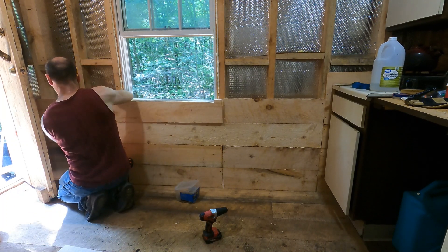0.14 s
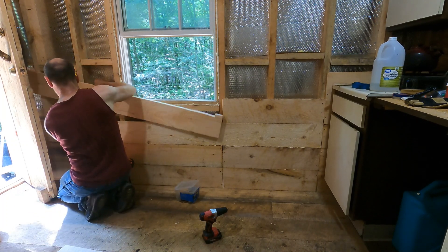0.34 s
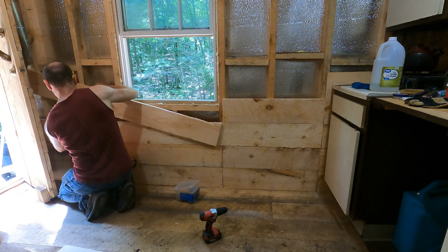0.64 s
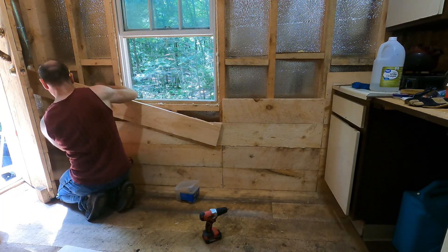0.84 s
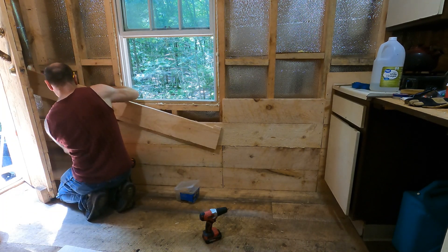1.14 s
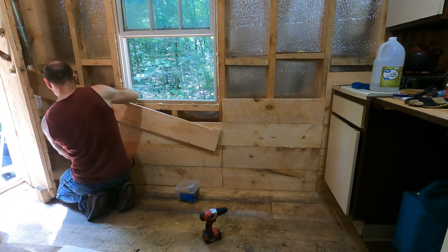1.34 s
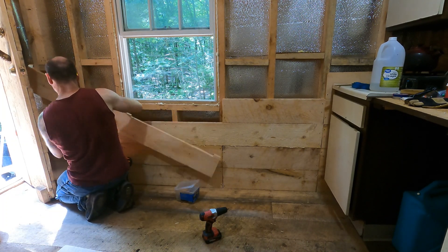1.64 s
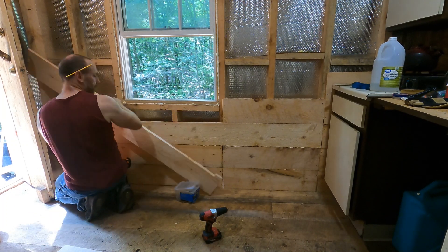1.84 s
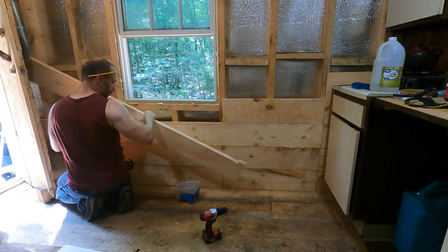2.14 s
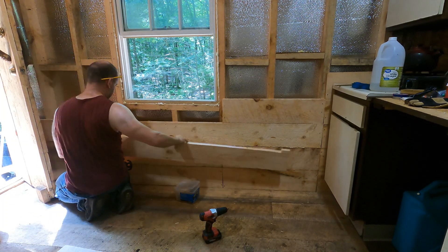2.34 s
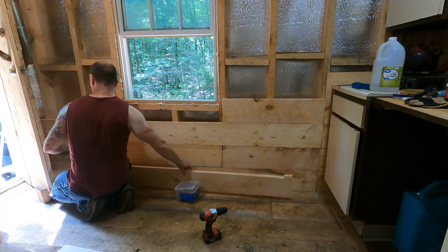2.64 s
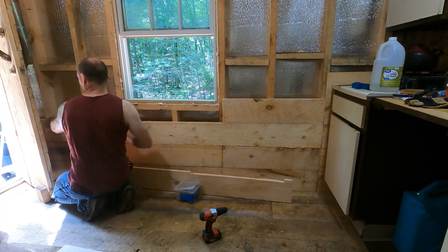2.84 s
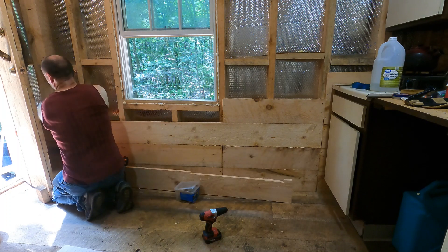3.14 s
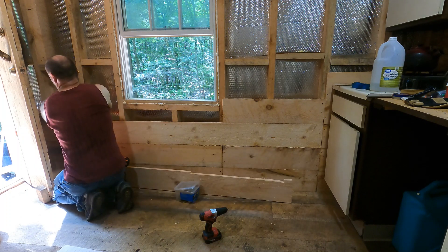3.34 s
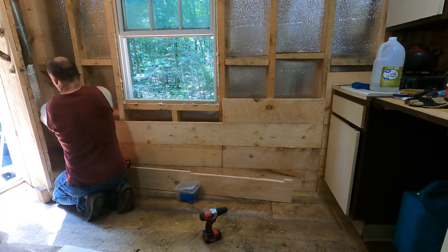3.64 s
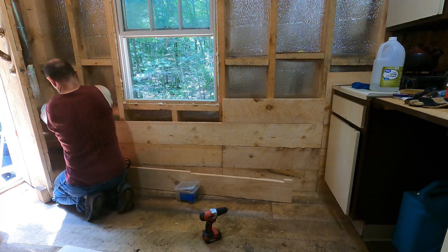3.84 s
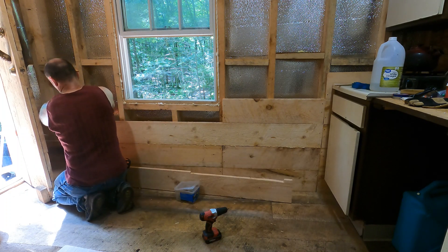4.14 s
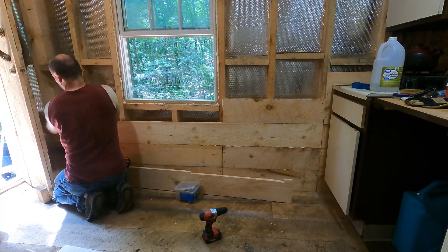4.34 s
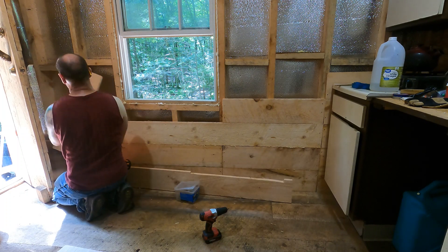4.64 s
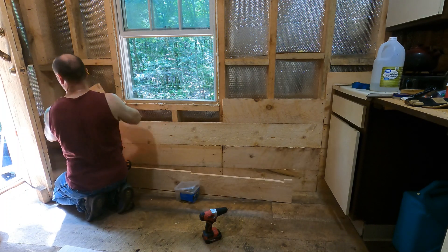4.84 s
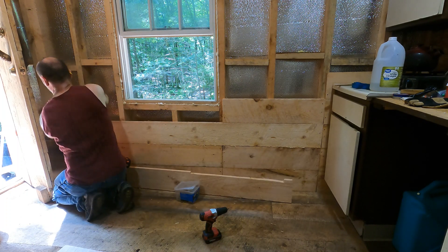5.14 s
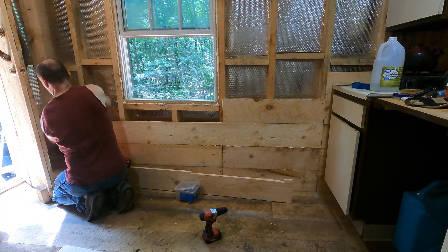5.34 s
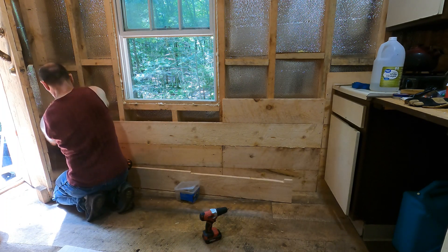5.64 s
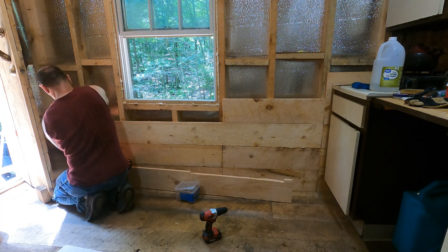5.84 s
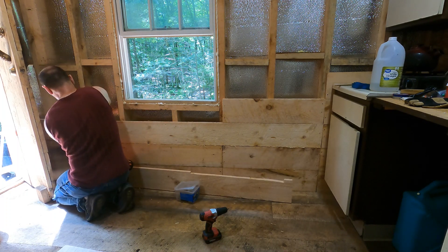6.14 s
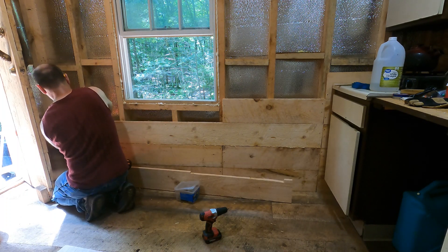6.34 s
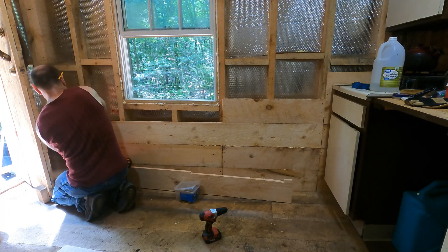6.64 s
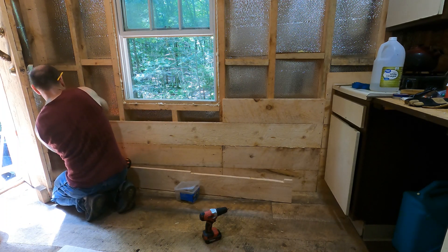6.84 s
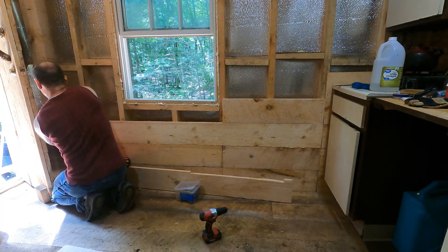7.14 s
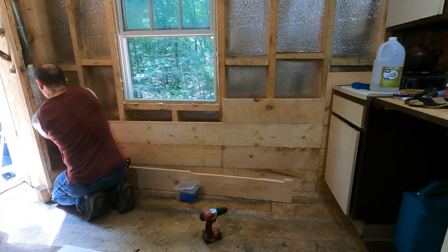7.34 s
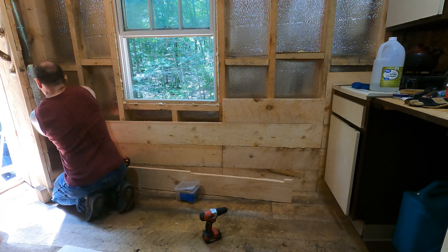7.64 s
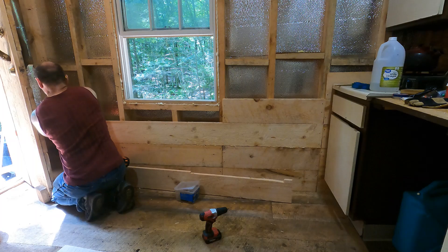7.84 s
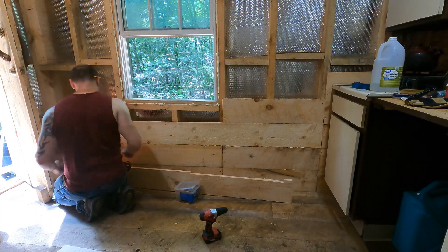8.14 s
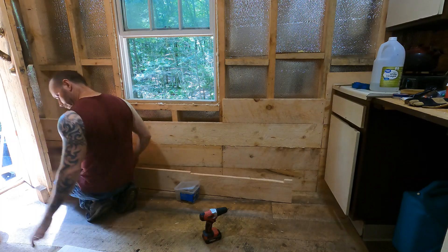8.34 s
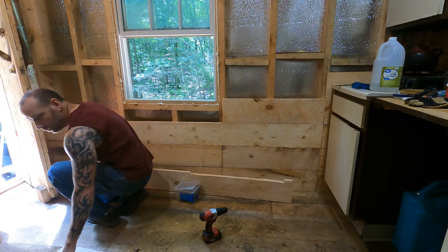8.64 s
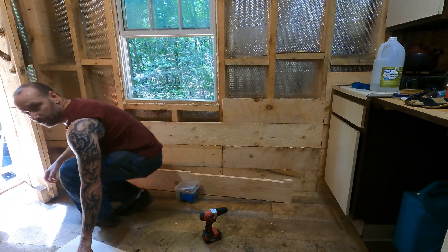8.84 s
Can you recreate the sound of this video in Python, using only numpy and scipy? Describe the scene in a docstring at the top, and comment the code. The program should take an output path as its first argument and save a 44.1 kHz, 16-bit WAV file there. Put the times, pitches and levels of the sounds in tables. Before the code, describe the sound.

Inside a small wooden building, planks are pulled loose and knocked against wall studs. Muffled bumps come first, then spaced harder knocks, a quick scrape and clatter as a board is set down, more fumbling thuds, two groups of firm knocks, and finally heavy soft floor thuds with brushing rubs. Faint dull taps recur further off. The stereo microphone sits a few metres away, with short, boxy room sound.

```python
"""Boards knocked about in a small wooden shed

Boards are pulled off, set down and thumped against the studs: each knock rings wall modes and a dense rattle.
Wood and cloth rub as patchy noise strokes; an edge skates, driving broad board resonances.
Soft thuds swing one low mode each; the floor rumbles under a kneeling weight and after knocks.
Further off a soft, dull two-tone tap comes and goes, often about a quarter second apart; air rustles faintly."""
import sys
import numpy as np
from scipy import signal
from scipy.fft import rfft, irfft, next_fast_len
from scipy.io import wavfile
from scipy.ndimage import uniform_filter1d, map_coordinates

SR = 44100
rng = np.random.default_rng(int(sys.argv[2]) if len(sys.argv) > 2 else 0)


def transcribe(signal):
    """Save signal, clipped to [-1, 1], as a 16-bit WAV file at the path in sys.argv[1]."""
    frames = np.atleast_2d(signal).T
    limited = np.clip(frames, -1, 1)
    pcm = np.round(limited * 32767).astype(np.int16)
    wavfile.write(sys.argv[1], SR, pcm)


N = 396900


def amp(db):
    """Gain of a level in dB."""
    return 10 ** (np.asarray(db) / 20)


def unit(x):
    """x at rms 1."""
    return x / np.sqrt(np.mean(x ** 2) + 1e-20)


def curves(rows, outside_db=-120):
    """One value per sample for each column after the time."""
    s, *cols = np.transpose(rows)
    t = np.arange(N) / SR
    return [np.interp(t, s, col, outside_db, outside_db) for col in cols]


def wobble(knots_per_s):
    """A smooth random curve through normally distributed knots."""
    knots = rng.standard_normal(int(N * knots_per_s / SR) + 4)
    return map_coordinates(knots, [np.arange(N) * knots_per_s / SR])


# Stereo image. Each row: frequency in Hz, left-right correlation 0-1, left over right in dB.
STEREO_IMAGE = [(220, .999, .2), (550, .97, .2), (1400, .85, 1.4), (4500, .72, .9), (11000, .87, .7)]


def noise(spectrum, size=N, ripple_db=0):
    """Stereo noise of rms 1 with a colour, alike in the bass, wider higher up; ripple adds random resonances."""
    m = next_fast_len(size)
    log_hz = np.log(np.fft.rfftfreq(m, 1 / SR) + 1)
    hz, db = np.transpose(spectrum)
    pair_hz, alike, lead_db = np.transpose(STEREO_IMAGE)
    turn = np.arccos(np.interp(log_hz, np.log(pair_hz), alike)) / 2
    lead = amp(np.interp(log_hz, np.log(pair_hz), lead_db) / 2)
    ripple = unit(uniform_filter1d(rng.standard_normal(len(log_hz)), size=30))
    gain = amp(np.interp(log_hz, np.log(hz + 1), db) + ripple_db * ripple)
    middle, side = rfft(rng.standard_normal((2, m))) * gain * [np.cos(turn), np.sin(turn)]
    return unit(irfft([(middle + side) * lead, (middle - side) / lead], m)[:, :size])


def patchy(x, patchy_db):
    """x under random patches of gain in time and frequency, at rms 1."""
    z = signal.stft(x, nperseg=512)[2]
    field = uniform_filter1d(rng.standard_normal(z.shape[1:]), size=3, axis=0)
    field = uniform_filter1d(field, size=5, axis=1)
    return unit(signal.istft(z * amp(patchy_db * unit(field)), nperseg=512)[1][:, :N])


def add(track, sound, s):
    """Mixes a sound into a track at a time in seconds."""
    part = track[:, round(s * SR):][:, :sound.shape[-1]]
    part += sound[..., :part.shape[1]]


# Rustle colour. Each row: frequency in Hz, relative density in dB per Hz.
AIR_COLOUR = [(500, -28), (900, -1), (3100, -1), (4500, -19.5), (16000, -22)]


def air():
    """A faint rustle that grows by half the dB of the shifting weight."""
    level_db = -50 + 0.5 * curves(FLOOR_WEIGHT)[0] + 5 * wobble(3.4)
    return amp(level_db) * patchy(noise(AIR_COLOUR), patchy_db=2)


# Far taps. Each row: time in seconds, level in dB.
FAR_TAPS = [(0.122, -33), (0.596, -36), (0.824, -38), (1.055, -36), (1.761, -43), (2.217, -39),
            (2.448, -35), (3.15, -39.5), (3.244, -41), (3.361, -36.5), (4.1, -34), (4.581, -38),
            (4.81, -33), (5.053, -34), (5.774, -38.5), (6.018, -32), (6.255, -31), (7.214, -41),
            (7.455, -40), (8.42, -44)]
# Tap tones. Each row: mean frequency in Hz, mean level in dB.
TAP_TONES = [(252, -2), (430, 0)]


def far_taps():
    """Short dull taps: two low tones and a puff of noise that swell, hold and stop."""
    out, t = np.zeros((2, N)), np.arange(SR // 10) / SR
    shape = (1 - np.exp(-t / 0.0044)) * np.exp(-(t / 0.035) ** 3)
    for s, db in FAR_TAPS:
        draws = rng.standard_normal((len(TAP_TONES), 3))
        tones = 0
        for (hz, tone_db), (level, pitch, phase) in zip(TAP_TONES, draws):
            tone = np.sin(2 * np.pi * hz * (1 + pitch / 100) * t + np.pi * phase)
            tones = tones + amp(tone_db + 2 * level) * tone
        puff = amp(-5) * noise(CREAK_COLOUR, size=len(t))
        add(out, amp(db) * shape * (tones + puff), s - .005)  # the swell starts early
    return out


# Weight shifting on the floor. Each row: time in seconds, level in dB.
FLOOR_WEIGHT = [(0, -39), (.3, -37), (1.8, -41.5), (1.95, -35), (2.15, -35.5), (2.35, -47.5), (3.0, -53.5),
                (3.3, -38.5), (4.98, -55.5), (5.1, -33.5), (5.85, -44.5), (6.15, -38), (6.45, -49),
                (8.6, -45), (8.68, -25.5), (9, -27.5)]
# Joist rumble colour. Each row: frequency in Hz, relative density in dB per Hz.
RUMBLE_COLOUR = [(28, -8.5), (59, 7), (97, 0), (190, -56.5)]
# Plank murmur colour, also the tap puff. Each row: frequency in Hz, relative density in dB per Hz.
CREAK_COLOUR = [(80, -39.5), (140, -0.5), (324, -13), (420, -6), (600, -34.5), (1300, -110)]
JOIST_RE_BOARD_DB, JOIST_T60_S = -12, 0.79


def floor():
    """Shifting weight and the knocks make the joists rumble in lumps and the planks murmur."""
    s, board_db = np.transpose(KNOCKS)[:2]
    kick_power = np.bincount((s * SR).astype(int), amp(2 * (board_db + JOIST_RE_BOARD_DB)), N)
    after_power = signal.lfilter([1], [1, -amp(-120 / (JOIST_T60_S * SR))], kick_power)
    level = np.sqrt(amp(2 * curves(FLOOR_WEIGHT)[0]) + after_power)
    lump = wobble(7.6)
    rumble = unit(amp(2.5 * lump) * noise(RUMBLE_COLOUR))
    creak_gain = amp(5 * lump + 1.3 * wobble(15))
    creak = unit(creak_gain * patchy(noise(CREAK_COLOUR), patchy_db=3.5))
    return level * (rumble + amp(-9.5) * creak)


# Thuds of a knee, a foot or the flat of a board. Each row: start in seconds, level in dB, mode in Hz.
SOFT_THUDS = [(0.222, -14, 69), (0.352, -8, 66.3), (.41, -12, 64), (0.847, -9, 82.9), (1.966, -8.5, 67),
              (2.028, -7.5, 58), (3.004, -12.5, 68.5), (3.475, -4, 147), (3.505, -7.5, 151.3),
              (4.811, -21.5, 69.6), (5.391, -15.5, 79), (5.495, -13.5, 139.4), (5.788, -25.5, 80),
              (6.213, -16, 60.2), (6.495, -4.5, 55.3), (6.638, -8, 56), (8.643, -6.5, 73), (8.813, -5, 85),
              (8.837, -13.5, 81)]
THUD_T60_S = 0.13


def thuds():
    """A soft weight sets one low mode swinging, with a weak overtone."""
    out, t = np.zeros((2, N)), np.arange(SR * 2 // 5) / SR
    for s, db, hz in SOFT_THUDS:
        overtone = np.sin(2 * np.pi * 1.7 * hz * t + rng.uniform(0, 2 * np.pi))
        swing = np.sin(2 * np.pi * hz * t) + amp(-11.0) * overtone
        add(out, amp(db - 60 * t / THUD_T60_S) * (1 - np.exp(-t / 0.0061)) * swing, s)
    return out


# Board resonances. Each row: centre in Hz, width before sharpening in Hz, relative level in dB.
BOARD_RESONANCES = [(1750, 250, 2), (2240, 280, -2.5), (3080, 140, 3.5), (4487, 420, -4), (6200, 600, -14),
                    (7000, 350, -15), (8950, 950, -18.5), (10400, 1100, -19)]
# Skating level. Each row: time in seconds, level in dB.
SKATE_LEVEL = [(2.56, -65.5), (2.6, -37), (2.72, -46.5), (2.77, -53.5)]


def skating():
    """A board edge sliding down the wall drives a few broad resonances of the board."""
    m = next_fast_len(N)
    f = np.fft.rfftfreq(m, 1 / SR)
    power = 0
    for centre, width, db in BOARD_RESONANCES:
        response = np.abs(f * width / (centre * centre - f * f + 1j * f * width))
        power = power + amp(2 * db) * response ** 3  # sharpened
    scrape = amp(2.5 * wobble(250)) * noise([(20, 0), (20000, 0)])
    ringing = irfft(rfft(scrape, m) * np.sqrt(power), m)[:, :N]
    return amp(curves(SKATE_LEVEL)[0]) * patchy(ringing, patchy_db=4.5)


# Rubbing strokes. Each row: middle in seconds, half length in seconds, hiss level in dB.
RUB_STROKES = [(0.052, 0.083, -65.5), (0.21, 0.027, -50), (0.262, 0.014, -50.5), (0.394, 0.071, -46),
               (0.462, 0.013, -58), (0.538, 0.037, -57.5), (0.858, 0.013, -59), (0.939, 0.026, -60.5),
               (1.972, 0.032, -46), (2.068, 0.012, -57), (2.302, 0.032, -54), (2.458, 0.021, -56),
               (2.488, 0.015, -42.5), (2.563, 0.029, -33), (2.831, 0.027, -56.5), (3.336, 0.17, -73.5),
               (3.536, 0.041, -51), (4.088, 0.026, -51.5), (4.303, 0.034, -58.5), (4.587, 0.012, -62.5),
               (4.692, 0.017, -64.5), (4.806, 0.037, -58.5), (5.177, 0.01, -49.5), (5.404, 0.027, -62),
               (5.519, 0.028, -52), (5.701, 0.033, -52.5), (5.953, 0.014, -59), (6.051, 0.015, -58),
               (6.318, 0.024, -57), (7.174, 0.0051, -66.5), (8.173, 0.037, -66.5), (8.579, 0.034, -55.5),
               (8.648, 0.028, -45.5), (8.732, 0.018, -52.5), (8.799, 0.027, -33), (8.881, 0.025, -57),
               (8.941, 0.018, -45.5), (8.99, 0.024, -34)]
# Hiss colour. Each row: frequency in Hz, relative density in dB per Hz.
HISS_COLOUR = [(1500, -6.5), (2500, 1), (4300, -2.5), (14800, -15), (16400, -32)]
# Rasp colour. Each row: frequency in Hz, relative density in dB per Hz.
RASP_COLOUR = [(300, -15), (600, -7.5), (3000, -18), (4300, -37), (7000, -120)]
RASP_RE_HISS_DB, RASP_DB_PER_S, LONGEST_PRESS_S = -1.5, 85.5, .07  # a longer stroke presses harder
RUB_PATCH_DB = 1.6


def rubbing():
    """Strokes of wood and cloth swell and fade: a grainy hiss over a duller rasp."""
    t = np.arange(N) / SR
    middle, half, hiss_db = np.transpose(RUB_STROKES)[:, :, None]
    since = (t - middle) / half
    swell = np.exp(-since ** 2 * np.where(since > 0, .6, 1))  # trails off slower than it starts
    rasp_db = hiss_db + RASP_RE_HISS_DB + RASP_DB_PER_S * np.minimum(half, LONGEST_PRESS_S)
    hiss_level = np.sum(amp(hiss_db) * swell, 0)
    rasp_level = np.sum(amp(rasp_db) * swell, 0)
    catch = wobble(60)  # the surfaces catch and let go
    hiss_grit = amp(0.83 * catch + 2.4 * wobble(400))
    hiss = patchy(hiss_grit * noise(HISS_COLOUR), patchy_db=RUB_PATCH_DB)
    rasp_grit = amp(0.89 * catch + 0.87 * wobble(160))
    rasp = patchy(rasp_grit * noise(RASP_COLOUR), patchy_db=RUB_PATCH_DB)
    return hiss_level * hiss + rasp_level * rasp


# Wall modes. Each row: mean frequency in Hz, mean level in dB, t60 before hand damping in seconds.
WALL_MODES = [(54, -8, .3), (80, -1, .2), (140, -7, .18), (240, -4, .15), (345, 2, .14), (450, -6, .12),
              (607, -19, .08), (813, -11, .08), (945, -16, .07), (1160, -18, .06), (1570, -22, .06),
              (1985, -22, .06)]


def wall_ring(t):
    """Wall modes struck at a random spot, which shifts their pitch and strength, then chattering."""
    hz, mode_db, t60_s = np.transpose(WALL_MODES)[:, :, None]
    level_draw, pitch_draw = rng.standard_normal((2, len(WALL_MODES), 1))
    strength = amp(mode_db + 3 * level_draw) * amp(-60 * t / t60_s)
    modes = np.sum(strength * np.sin(2 * np.pi * hz * (1 + 0.017 * pitch_draw) * t), 0)
    modes = modes * (0.51 + amp(-60 * t / 0.53))  # the pressing hand takes the swing down
    bounces = (rng.uniform(0.00392, .022, 3) * SR).astype(int)  # the board chatters before it rests
    return modes + sum(amp(-8.5) * np.pad(modes, (k, 0))[:len(t)] for k in bounces)


# Knocks. Each row: start in seconds, board level in dB, rap re board in dB, crack re board in dB.
KNOCKS = [(0.315, -18.5, -26, -36), (0.344, -16.5, -20.5, -27), (0.394, -17.5, -24, -38.5),
          (0.425, -14, -16, -35), (0.502, -14, -24.5, -53), (0.555, -25.5, -32, -54),
          (0.607, -43, -8, -4.5), (0.682, -15.5, -5.5, -29), (1.082, -10.5, -6.5, -16.5),
          (1.262, -14, -9.5, -14.5), (1.498, -14, -8, -17),
          (1.585, -31, -9.5, -17.5),(1.847, -18.5, -18, -18.5), (1.964, -18, -15.5, -15),
          (2.154, -43.5, -8, -13.5), (2.568, -11, -7, -17.5), (2.693, -20.5, -21, -32),
          (2.763, -18, -17.5, -34), (2.777, -13, -2.5, -32), (2.82, -16.5, -16, -46.5),
          (3.436, -19.5, -4.5, -6.5), (3.463, -17.5, -2, -10.5), (3.501, -16, -9.5, -24.5),
          (3.547, -16, -21.5, -37.5), (3.603, -15.5, -21.5, -49.5), (3.685, -29.5, -12, -32.5),
          (3.752, -26.5, -25, -44), (3.826, -19.5, -19.5, -43), (4.094, -39, -7.5, -19),
          (4.313, -14.5, -23.5, -41.5), (4.352, -15, -17, -34), (5.08, -35.5, -9.5, -11),
          (5.184, -13, -13.5, -48.5), (5.239, -16, -32, -41.5), (5.261, -21.5, -21, -37),
          (5.46, -17.5, -34, -40), (5.485, -19.5, -24, -49), (5.771, -40, -13.5, -29.5),
          (6.071, -22.5, -36, -35.5), (6.214, -41.5, 2.5, -4.5), (6.493, -10, -7.5, -16),
          (6.637, -11, -7.5, -16), (6.793, -11, -8.5, -14), (7.325, -40.5, -7.5, -45),
          (7.512, -15, -15.5, -23.5), (7.671, -13.5, -10, -17.5), (7.847, -14.5, -9.5, -18.5),
          (8.031, -38, -14.5, -19), (8.963, -28.5, -4.5, -8.5)]
# Registers, low to high: thump, board, rap, snap, crack.
# Each row: low edge in Hz, high edge in Hz, main t60 in seconds, power share of dense rattle 0-1.
KNOCK_REGISTERS = [(47, 180, 0.34, 0.3), (135, 526, 0.21, 0.62), (625, 1260, 0.15, 0.84),
                   (1445, 3590, 0.17, 0.7), (2840, 23000, 0.12, 1)]
# Rattle colour. Each row: frequency in Hz, relative density in dB per Hz.
RATTLE_COLOUR = [(21, -30), (35, 4), (272, -4), (351, -7.5), (572, -19), (798, -13.5), (2010, -23),
                 (16000, -50.5)]
# Faint ring with each knock, louder on hard ones. Each row: frequency in Hz, relative density in dB per Hz.
SHIMMER_COLOUR = [(2900, -41), (3080, -2), (3240, -12.5), (3400, -2.5), (3600, -40.5), (7600, -44)]
THUMP_RE_BOARD_DB, THUMP_PER_CRACK = 3, 0.14  # harder blows pass more to the floor
SNAP_RE_RAP_DB, SNAP_SHARE = -3.5, 0.28  # share: how far the snap leans from rap to crack
# Span while the struck board is held clear of the studs. One row: start in seconds, end in seconds.
LOOSE_SPAN = (2.5, 4.5)
LOOSE_THUMP_DB, LOOSE_LOW_HZ = -2, 90  # a loose board thumps less and lacks deep bass


def knocks():
    """Each knock bounces a few times, rings the wall's modes and shakes loose a dense rattle."""
    out, t = np.zeros((2, N)), np.arange(SR // 3) / SR
    bands = [signal.butter(3, [low, min(high, TOP_HZ)], "bandpass", fs=SR, output="sos")
             for low, high, *_ in KNOCK_REGISTERS]
    thin = signal.butter(3, [LOOSE_LOW_HZ, KNOCK_REGISTERS[0][1]], "bandpass", fs=SR, output="sos")
    for s, board_db, rap_db, crack_db in KNOCKS:
        loose = LOOSE_SPAN[0] < s < LOOSE_SPAN[1]
        modes = wall_ring(t)
        rise_s = min(0.00098 * amp(-.55 * (crack_db + 20)), .007)  # a dull, soft contact builds slowly
        rise = 1 - np.exp(-t / rise_s)
        jolts_db = 0.61 * np.interp(t, np.linspace(0, t[-1], 40), rng.standard_normal(40))
        uneven = rise * amp(jolts_db)  # loose parts jolt
        shimmer_db = board_db + crack_db - 25 - 60 * t / .5
        add(out, amp(shimmer_db) * noise(SHIMMER_COLOUR, size=len(t)), s)

        thump_db = THUMP_RE_BOARD_DB + THUMP_PER_CRACK * crack_db + LOOSE_THUMP_DB * loose
        snap_db = rap_db + SNAP_RE_RAP_DB + SNAP_SHARE * (crack_db - rap_db)
        levels_db = [board_db + re_board for re_board in (thump_db, 0, rap_db, snap_db, crack_db)]
        knock_bands = [thin if loose else bands[0]] + bands[1:]
        for band, db, (_, _, t60_s, share) in zip(knock_bands, levels_db, KNOCK_REGISTERS):
            fall = amp(-60 * t / t60_s)
            fall += amp(-31.5 - 60 * t / (3.1 * t60_s))  # the shed prolongs the end
            # the first contact is the sharpest, more so on hard wood
            fall += 0.79 * amp(0.1 * (crack_db + 8.0)) * amp(-60 * t / (0.11 * t60_s))
            shaken = noise(RATTLE_COLOUR, size=len(t), ripple_db=4.0) * fall * uneven
            rattle = unit(signal.sosfilt(band, shaken))
            ring = unit(signal.sosfilt(band, modes * rise))
            both = np.sqrt(share) * rattle + np.sqrt(1 - share) * ring
            loudest = np.sqrt(np.max(uniform_filter1d(both[0] ** 2, size=SR // 100)))  # 10 ms rms
            add(out, amp(db) * both / loudest * np.sqrt(1 - t / t[-1]), s)
    return out


def scene():
    """Everything in the shed sounds at once."""
    return air() + far_taps() + floor() + thuds() + skating() + rubbing() + knocks()


TOP_HZ = 16300


def record(dry):
    """The microphone drops the deepest bass, loud blows round off softly, nothing is kept above TOP_HZ."""
    x = signal.sosfilt(signal.butter(2, 40, "highpass", fs=SR, output="sos"), dry)
    x = x / (1 + np.abs(x / .85) ** 4) ** (1 / 4)
    m = next_fast_len(N + SR // 2)
    kept = np.fft.rfftfreq(m, 1 / SR) < TOP_HZ
    return irfft(rfft(x, m) * kept, m)[:, :N]


dry = scene()
out = record(dry)
transcribe(out)
```